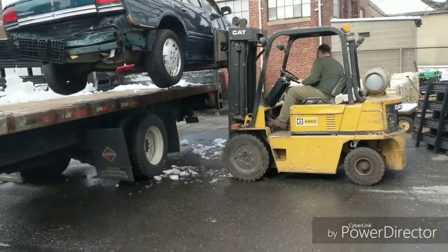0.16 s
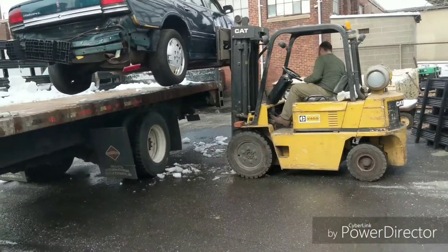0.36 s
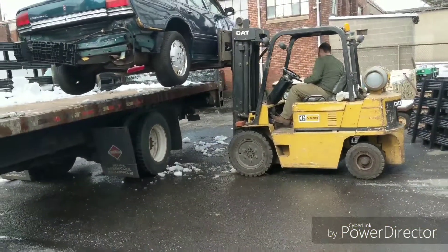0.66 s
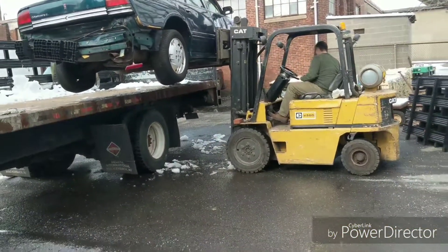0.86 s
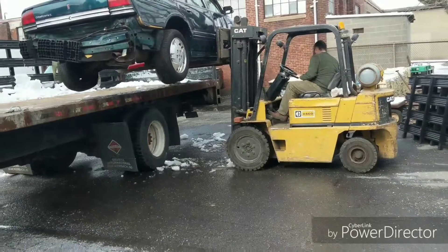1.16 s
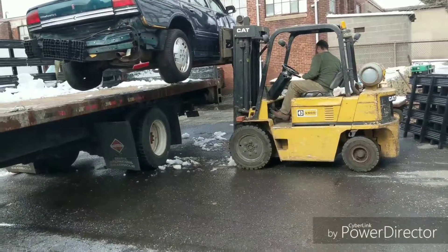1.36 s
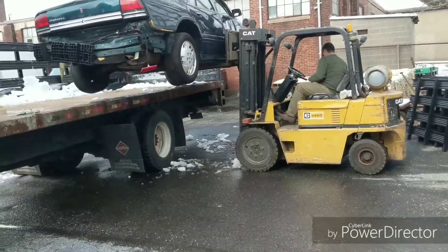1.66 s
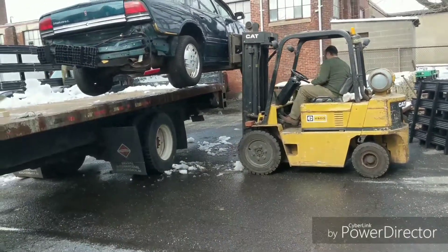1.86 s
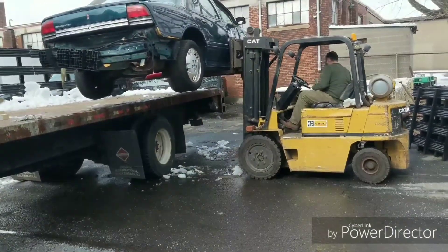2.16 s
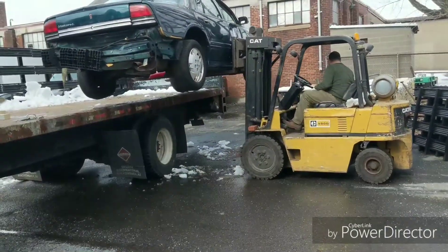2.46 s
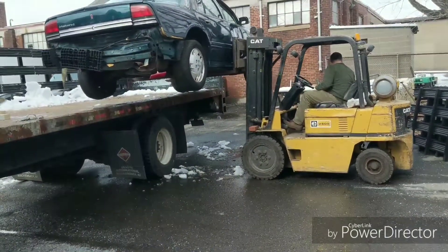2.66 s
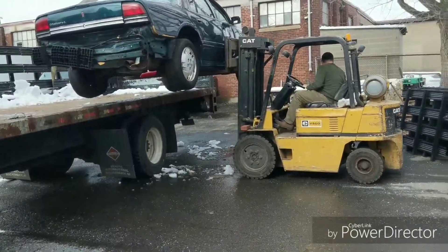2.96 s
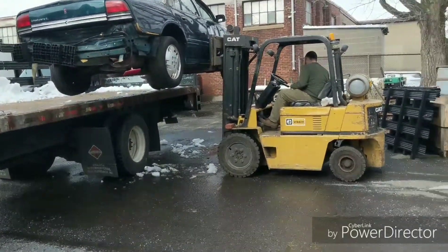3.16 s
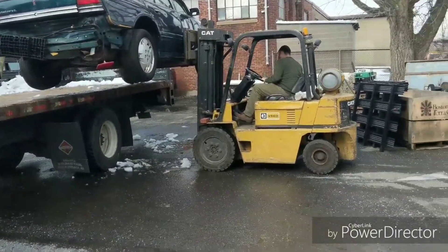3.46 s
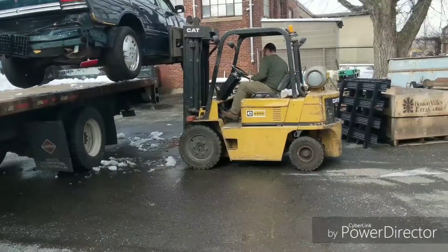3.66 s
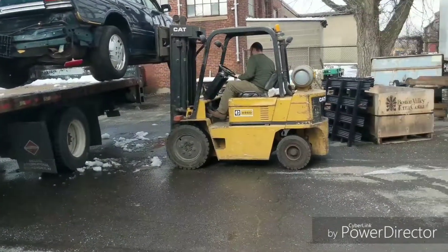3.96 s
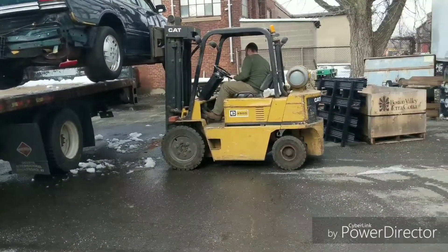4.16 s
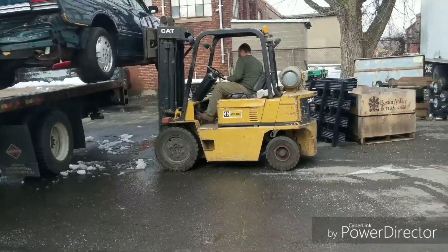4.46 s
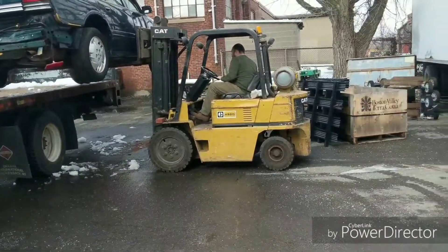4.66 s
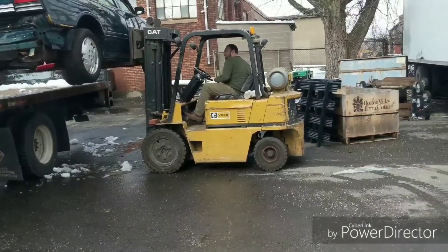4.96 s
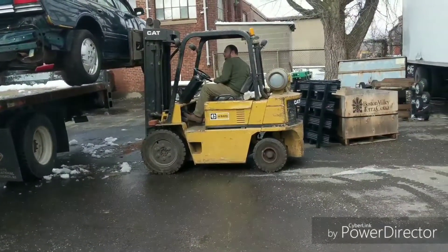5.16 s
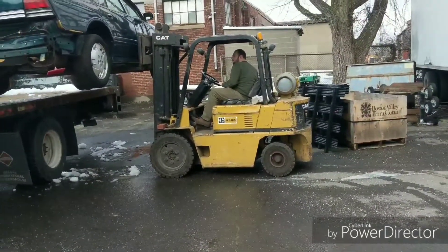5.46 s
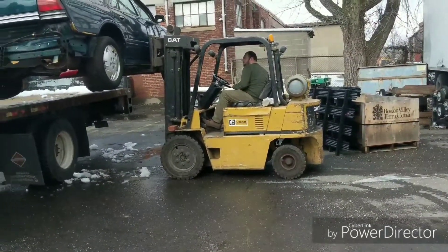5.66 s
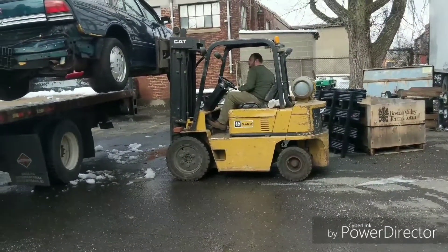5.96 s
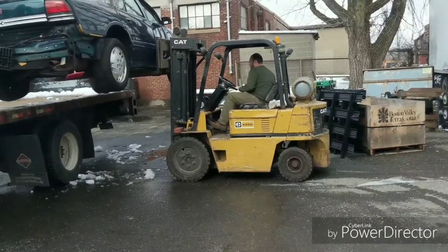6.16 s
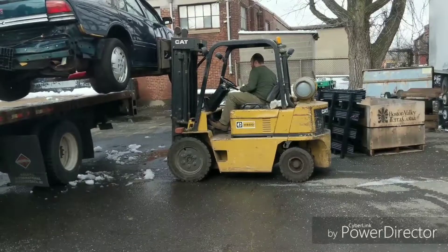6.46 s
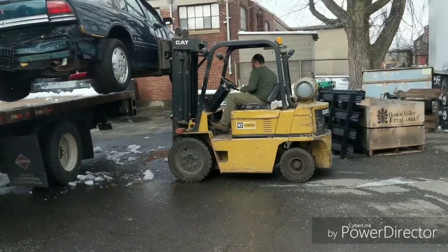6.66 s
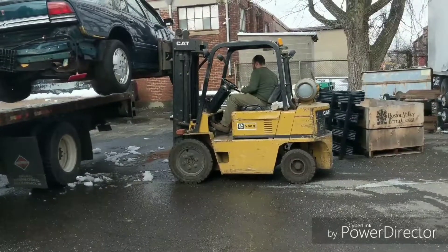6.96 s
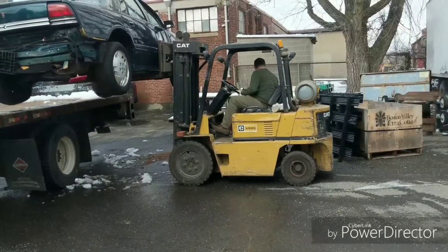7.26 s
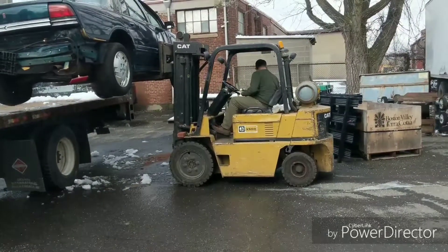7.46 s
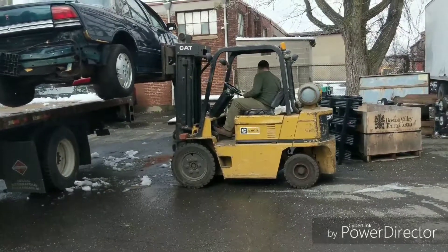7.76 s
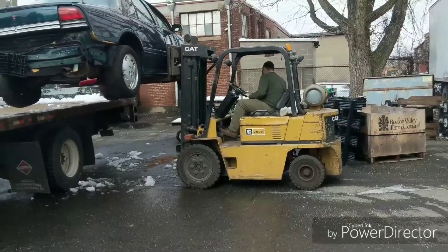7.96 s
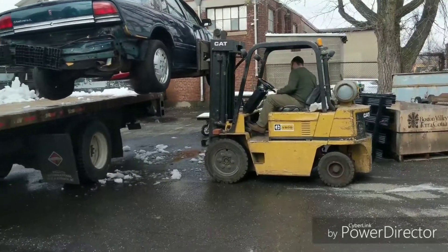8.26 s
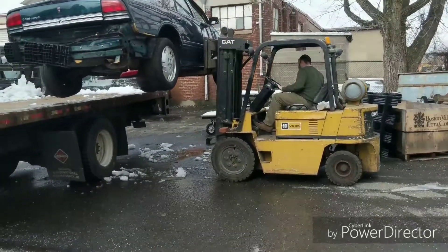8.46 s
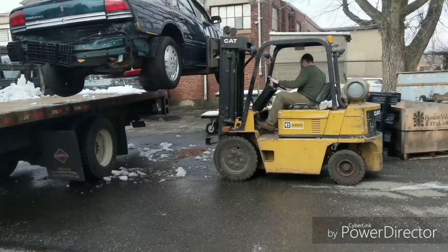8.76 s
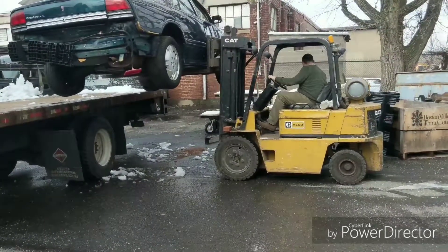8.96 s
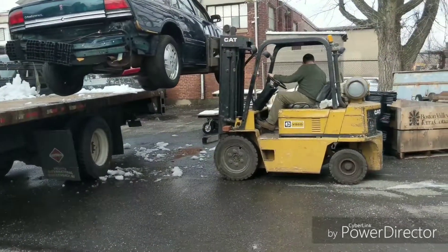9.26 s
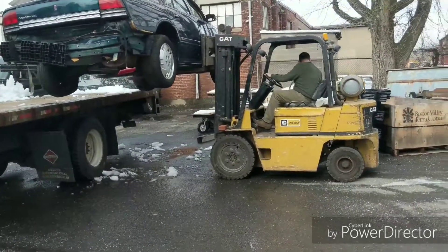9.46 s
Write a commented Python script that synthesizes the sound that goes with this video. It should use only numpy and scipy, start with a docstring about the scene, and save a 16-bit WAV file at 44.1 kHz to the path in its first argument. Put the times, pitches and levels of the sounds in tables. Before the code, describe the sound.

A forklift engine revs up and down with a booming exhaust while a diesel truck idles and clatters close by.

```python
"""A gas forklift's four-cylinder engine surges and settles in a yard as its driver feathers the throttle.
Its exhaust booms as the revs climb, lumpy from unequal cylinders; a rasp swells once as they first drop.
Close by, a six-cylinder diesel truck idles evenly: combustion knocks, valve ticks, gear clatter and a
ringing block over fan and yard noise. An automatic gain control ducks the mix whenever the exhaust booms."""
import sys
import numpy as np
from scipy import signal
from scipy.fft import rfft, irfft, next_fast_len
from scipy.io import wavfile
from scipy.ndimage import uniform_filter1d, map_coordinates

SR = 44100
rng = np.random.default_rng(int(sys.argv[2]) if len(sys.argv) > 2 else 0)


def wav_record(signal):
    """Record a signal, one row per channel, as 16-bit PCM in the file named by sys.argv[1]."""
    frames = np.transpose(np.atleast_2d(signal))
    bounded = np.clip(frames, -1, 1)
    # unit amplitude maps onto the largest positive 16-bit level
    quanta = np.round(bounded * 32767).astype(np.int16)
    wavfile.write(sys.argv[1], SR, quanta)


N = 423359
IDLE_HZ, FIRST_FIRING_S = 36.873, 0.01564  # the diesel's firing rate and offset

# Drone, whine and exhaust tone levels are set in their tables; noise and clatter get theirs in the mix.
# turning points of the forklift's revs: time_s, firing_hz
REV_POINTS = [(0.04, 56.12), (0.62, 47.1), (1.36, 55.07), (2.1, 47.04), (2.3, 47.36), (2.931, 55.14),
              (3.39, 50.3), (4.0, 56.28), (4.88, 40.55), (5.08, 40.2), (5.3, 41.16), (6.219, 59.94),
              (6.92, 54.5), (7.54, 59.1), (7.88, 58.44), (8.29, 59.04), (9.24, 51.04), (9.6, 54.87)]
# the exhaust comes on song as the revs climb: firing_hz, tone_db, boom_db, lope_db, lumps_db
EXHAUST_VOICING = [(39.8, -44, -30, -37, -5), (46.7, -40, -28.5, -26, -2), (48.7, -34, -27, -37, -2),
                   (50.4, -29, -30.5, -35, -3.5), (53.2, -25.5, -25, -32, -2), (55.1, -22, -18, -31.5, -1),
                   (57.7, -21.5, -16.5, -32, -2), (59.4, -24, -14.5, -35, -0.5)]
# extra push for each Hz/s the revs gain: tone_db, boom_db, lope_db, lumps_db
THROTTLE_PUSH = [0.033, .1, 0.054, 0.061]
# overtones from unequal cylinders: firing_multiple, level_db
CYLINDER_LUMPS = [(2, 5.5), (2.5, 0.5), (3.5, 1), (4, 2.5), (4.5, -1), (5, 1.5), (5.499, -6.5), (6, -3),
                  (1.25, -11), (1.75, -24), (2.249, -10), (2.748, -31), (3.249, -22), (3.75, -20),
                  (4.25, -17), (4.75, -27)]
# the exhaust pipe's colouring of those overtones: frequency_hz, gain_db
PIPE_EQ = [(50, -41), (100, -32.5), (190, -32), (230, -31.5), (260, -40.5), (330, -43.5), (400, -50)]
# turbulent exhaust rumble: frequency_hz, gain_db
RUMBLE_EQ = [(21, -37), (35, -21), (71, 2), (139, 11), (184, 6), (265, 1.5), (335, -5.5), (400, -18.5),
             (500, -5.5), (650, -26), (1100, -120)]
# firing strength of each diesel cylinder: level_db
CYLINDER_ACCENTS = [1, 1, 1, 2, 2, 0]
# diesel exhaust tones: firing_multiple, level_db
DRONE_TONES = [(1, -46), (2, -33), (3, -41), (4, -44), (5, -46), (6, -43), (7, -48), (9, -44)]
# gear and pump whines: firing_multiple, level_db
WHINE_TONES = [(20, -48), (22.5, -38.5), (27, -47), (29, -40), (30, -43), (34, -39.5), (37, -47),
               (38.5, -45)]
# combustion knock: frequency_hz, gain_db
KNOCK_EQ = [(940, -15), (1600, -5), (1950, -1.5), (2520, -8.5), (3800, -10), (4300, -11.5), (5600, -14.5),
            (6340, -12), (7240, -18), (10700, -21), (15500, -35)]
# resonances of the block and panels: pitch_hz, width_hz, level_db
BLOCK_MODES = [(343.7, 23.7, 2.5), (689, 92, -0.5), (946, 67, -0.5), (1170, 106, 0.5), (1423, 99, -0.5),
               (1873, 280, -10), (2340, 53, -11.5)]
# metal blows within each diesel cycle: start_ms, pitch_hz, level_db
CYCLE_BLOWS = [(0.96, 687, -13), (3.9, 760, -1.5), (10.66, 930, -1), (12, 1600, -13), (17.87, 1250, 2.5),
               (25.87, 1240, 8), (25.94, 850, -11), (33.48, 1230, 6.5), (40.33, 820, -17), (41, 1480, 0),
               (44, 1250, -2), (47.35, 805, 2), (53.3, 800, -6), (64, 780, 2.5), (69.1, 2100, -5),
               (69.2, 1500, -3), (74, 800, -0.5), (81, 1240, -4), (95, 1950, -1), (94, 1450, -2.5),
               (101.7, 1200, 6.5), (107, 1400, 0.5), (104, 880, -16), (107.6, 1220, -0.5), (113.3, 1040, 4),
               (121.3, 1900, -4), (124, 1480, 4.5), (127, 1950, -3.5), (125.7, 890, -1.5), (130.5, 620, -5),
               (137, 1200, 0.5), (138.4, 785, -1.5), (146.7, 890, -0.5), (150.6, 1950, -6), (154, 2800, -3),
               (150.5, 1770, 0), (19.3, 3270, -17), (65.8, 3400, -6), (97.7, 5700, -10), (103, 4010, -5),
               (119.9, 3660, -8), (120.9, 2330, -3.5), (123.5, 6420, -9), (125.6, 3720, -5),
               (153, 6500, -15)]
# resonances of the valve gear: pitch_hz, width_hz, level_db
VALVE_MODES = [(3302, 56, 4.5), (3760, 57, 5), (3885, 75, 3), (6276, 93, 5), (6590, 100, -0.5),
               (8750, 370, -9)]
# the sharpest valve taps: start_s, level_db
VALVE_TAPS = [(0.9338, -20), (1.2381, -22), (2.2388, -26), (2.5641, -28), (3.217, -13), (3.5409, -17),
              (4.5171, -25), (5.006, -20), (5.0883, -29), (6.9576, -18), (7.2828, -18), (7.9638, -21),
              (8.2356, -25), (8.586, -17), (8.9088, -23)]
# fader ride on the truck's roar and clatter: time_s, gain_db
TRUCK_RIDE = [(0, 3.5), (.2, -0.5), (.42, 1.5), (.65, 0.5), (1.4, 1), (1.65, -4), (1.75, 2.5), (2, .5),
              (3.1, 0.8), (3.7, 1), (4.3, 1), (5.5, 0), (6.2, 1), (8.9, 0.1), (9.2, -1.5), (9.6, 1.5)]
# rough mid-range rush: frequency_hz, gain_db
RASP_EQ = [(500, -20), (720, 2), (1000, 0), (1300, -3), (1600, -20), (3000, -120)]
# cooling fan and yard noise: frequency_hz, gain_db
ROAR_EQ = [(150, -25), (250, -5), (400, -1.5), (570, -1.5), (800, -1), (1220, 2.5), (1610, -5),
           (1950, -7.5), (2530, -10.5), (3820, -12), (5690, -16), (6420, -16), (7240, -21), (10800, -25),
           (15500, -42)]


def forklift():
    """Exhaust pulses: the firing tone and its third multiple boom on throttle, lumps fill in between."""
    hz = revs()
    climb_hz_per_s = np.gradient(hz) * SR
    voicing_hz, *levels = np.transpose(EXHAUST_VOICING)
    tone_db, boom_db, lope_db, lumps_db = [np.interp(hz, voicing_hz, db) + push_db * climb_hz_per_s
                                           for db, push_db in zip(levels, THROTTLE_PUSH)]
    phase = .5 + np.cumsum(hz) / SR
    tone = amp(tone_db) * tones(phase, [(1, 0)], waver_db=.8, waver_hz=8)
    boom = amp(boom_db) * tones(phase, [(3, 0)], waver_db=.6, waver_hz=12)
    lope = amp(lope_db + 2.5 * wobble(5)) * tones(phase, [(1.5, 0)], waver_db=1.2, waver_hz=8)
    lumps_gain = amp(lumps_db + 1.4 * wobble(18) + 1.58 * wobble(6))
    lumps = lumps_gain * tones(phase, CYLINDER_LUMPS, waver_db=1.5, waver_hz=7, firing_hz=hz)
    rumble = amp(-25.5) * noise(eq(RUMBLE_EQ))
    return tone + boom + lope + lumps + rumble


def revs():
    """The forklift's firing rate in Hz: the flywheel eases from one turning point to the next."""
    time_s, hz = np.transpose(REV_POINTS)
    points = np.arange(len(time_s))
    place = np.interp(np.arange(N) / SR, time_s, points)
    previous = np.floor(place)
    ease = (1 - np.cos(np.pi * (place - previous))) / 2
    return np.interp(previous + ease, points, hz)


def diesel():
    """The idling truck: exhaust drone, gear whine and metal noises over the roar of fan and yard."""
    crank = np.arange(N) + .00013 * SR * (wobble(6) + 1.5 * wobble(1.2))  # in samples; the idle wanders
    phase = crank * IDLE_HZ / SR
    drone = tones(phase, DRONE_TONES, waver_db=1.9, waver_hz=3)
    whine = tones(phase, WHINE_TONES, waver_db=2, waver_hz=3.3)
    ride = amp(np.interp(np.arange(N) / SR, *np.transpose(TRUCK_RIDE)))
    engine = drone + whine + amp(-35) * knock(crank) + amp(-30.5) * block_ring(crank) + valves()
    return engine + ride * (amp(-32) * clatter(crank) + amp(-29) * fan_and_yard())


def knock(crank):
    """Each combustion lands as a hard burst of noise, much alike from cycle to cycle."""
    pressure = firings(scatter_db=3.5, delay_s=-0.0063, rise_s=0.0073, fall_s=0.011)
    return unit(filtered(cycle_noise(crank, fresh=.7) * pressure, eq(KNOCK_EQ)))


def block_ring(crank):
    """The engine's repeating shake keeps the block and panels ringing."""
    return unit(filtered(cycle_noise(crank, fresh=.71), modes(BLOCK_MODES)))


def clatter(crank, drift_db=1.6, drift_s=.00007):
    """Gears, tappets and pins strike at set crank angles; each blow drifts from cycle to cycle."""
    start_ms, hz, db = np.transpose(CYCLE_BLOWS)[..., None]
    cycle_s = len(CYLINDER_ACCENTS) / IDLE_HZ
    cycles = np.arange(int(N / SR / cycle_s) + 1)
    chance = rng.standard_normal((len(cycles), len(CYCLE_BLOWS), 2))
    time_drift, level_drift = np.sqrt(3) * uniform_filter1d(chance, size=3, axis=0).T
    due_s = cycles * cycle_s + start_ms / 1000 + drift_s * time_drift
    starts = np.interp(due_s * SR, crank, np.arange(N), right=N)
    t = np.arange(SR // 20) / SR
    ring_s = .065 * np.sqrt(1250 / hz)  # low notes hang on longer
    rings = amp(-60 * t / ring_s) * (1 - np.exp(-t / .0025)) * np.sin(2 * np.pi * hz * t)
    blows = amp(db + drift_db * level_drift)[..., None] * rings[:, None]
    samples = starts.astype(int)[..., None] + np.arange(len(t))
    return unit(np.bincount(samples.ravel(), blows.ravel(), N)[:N])


def valves():
    """Sparse metal contacts make each valve gear resonance chirp; a few bright taps stand out."""
    chirps = 0
    for mode in VALVE_MODES:
        contacts = rng.standard_normal(N) * (rng.random(N) < .02)
        drive = contacts * firings(scatter_db=8.5, delay_s=-0.0022, rise_s=0.0035, fall_s=0.024)
        chirps = chirps + filtered(drive, modes([mode]))
    start_s, db = np.transpose(VALVE_TAPS)
    envelope = swells(start_s, db, rise_s=0.0011, fall_s=0.0079, length_s=.05)
    taps = envelope * noise(modes(VALVE_MODES[2:]))  # a tap rings the high modes
    return amp(-40.5) * unit(chirps) + amp(-7.5) * taps


def rasp(peak_s=0.47, width_s=0.24):
    """A single swell of grainy mid-range noise."""
    swell = np.exp(-.5 * ((np.arange(N) / SR - peak_s) / width_s) ** 2)
    return amp(-32 + 2.5 * wobble(30.1)) * swell * noise(eq(RASP_EQ))


def fan_and_yard():
    """The bed: a broad, faintly fluttering roar of cooling fan and yard."""
    return amp(0.37 * wobble(6.7)) * noise(eq(ROAR_EQ))


def firings(scatter_db, delay_s, rise_s, fall_s):
    """The diesel's pressure envelope: one swell per firing, sized by cylinder and by chance."""
    count = np.arange(int(N / SR * IDLE_HZ))
    time_jitter, level_jitter = rng.uniform(-1.12, 1, (len(count), 2)).T
    start_s = FIRST_FIRING_S + delay_s + count / IDLE_HZ + 0.0019 * time_jitter
    db = np.take(CYLINDER_ACCENTS, count % 6) + scatter_db * level_jitter
    return unit(swells(start_s, db, rise_s, fall_s, length_s=.1))


def swells(start_s, db, rise_s, fall_s, length_s):
    """An envelope with one attack and decay at each start time."""
    spikes = np.bincount(np.clip((start_s * SR).astype(int), 0, N - 1), amp(db), N)
    t = np.arange(round(length_s * SR)) / SR
    return signal.fftconvolve(spikes, (1 - np.exp(-t / rise_s)) * np.exp(-t / fall_s))[:N]


def cycle_noise(crank, fresh):
    """One diesel cycle of noise looped with the crank, with fresh noise blended in."""
    length = round(len(CYLINDER_ACCENTS) * SR / IDLE_HZ)
    loop = np.interp(crank, np.arange(length), rng.standard_normal(length), period=length)
    return loop + fresh * rng.standard_normal(N)


def tones(phase, partials, waver_db, waver_hz, firing_hz=None):
    """Wavering sines on a phase counted in firings; given firing_hz, the exhaust pipe colours them."""
    total = 0
    for multiple, db in partials:
        multiple = np.round(4 * multiple) / 4  # four-stroke overtones sit on quarters
        pipe = 1 if firing_hz is None else eq(PIPE_EQ)(multiple * firing_hz[::64]).repeat(64)[:N]
        # the partials stay roughly in step, which keeps each puff short
        lag = .24 + .015 * multiple ** 2 + .2 * rng.random() + .055 * wobble(4)
        gain = pipe * amp(db + waver_db * wobble(waver_hz))
        total = total + gain * np.sin(2 * np.pi * (multiple * phase - lag))
    return np.sqrt(2) * total


def noise(response):
    """Coloured noise at rms 1."""
    return unit(filtered(rng.standard_normal(N), response))


def filtered(x, response):
    """x through a frequency response."""
    size = next_fast_len(N + SR // 2)
    return irfft(rfft(x, size) * response(np.fft.rfftfreq(size, 1 / SR)), size)[:N]


def eq(points):
    """An EQ curve through points on a log frequency axis."""
    hz, db = np.transpose(points)
    return lambda f: amp(np.interp(np.log(f + 1), np.log(hz + 1), db))


def modes(table):
    """The response of a bank of resonators with alternating polarity."""
    return lambda f: sum((-1) ** k * amp(db) * 1j * f * width / (hz * hz - f * f + 1j * f * width)
                         for k, (hz, width, db) in enumerate(table))


def wobble(rate_hz):
    """A smooth random curve with rate_hz knots a second."""
    knots = rng.standard_normal(int(N * rate_hz / SR) + 4)
    return map_coordinates(knots, [np.arange(0, N, 64) * rate_hz / SR]).repeat(64)[:N]


def amp(db):
    """dB to gain."""
    return 10 ** (np.asarray(db) / 20)


def unit(x):
    """Scaled to rms 1."""
    return x / np.sqrt(np.mean(x ** 2) + 1e-20)


def scene():
    """Both engines and the brief rasp, in mono."""
    return (forklift() + diesel() + rasp())[None]


def record(dry, response_s=.12, unity_db=-16.5, top_hz=15600):
    """Gain control leans 2:1 against the recent loudness; a steep low-pass trims the top."""
    mono = dry[0]
    pole = np.exp(-1 / (response_s * SR))
    opening_power = np.mean(mono[:SR // 10] ** 2)
    power = signal.lfilter([1 - pole], [1, -pole], mono ** 2, zi=[opening_power])[0]
    gain = (power / amp(unity_db) ** 2) ** -.25
    return filtered(mono * gain, lambda hz: hz < top_hz)[None]


dry = scene()
out = record(dry)
wav_record(out)
```